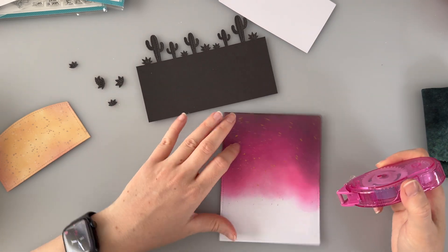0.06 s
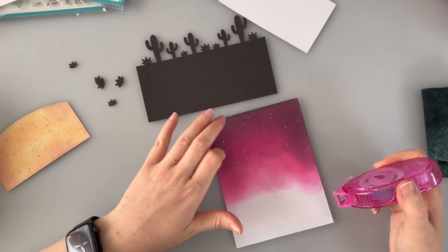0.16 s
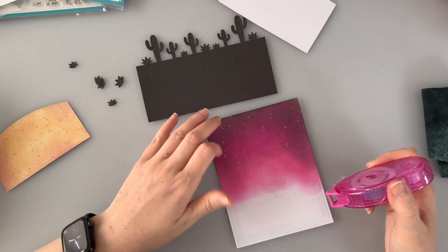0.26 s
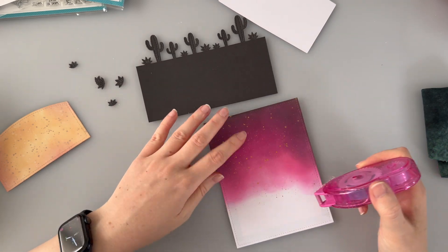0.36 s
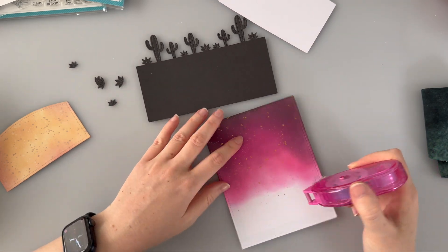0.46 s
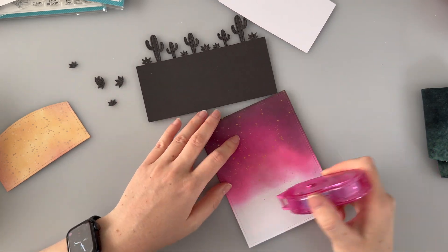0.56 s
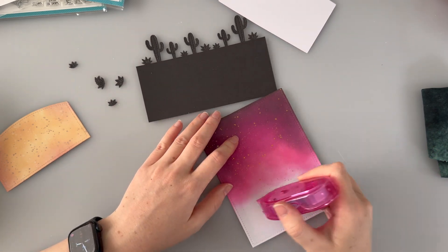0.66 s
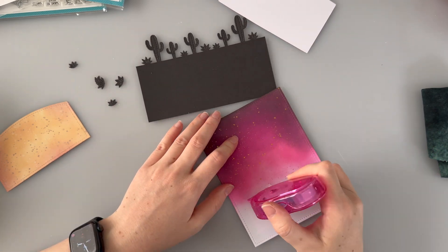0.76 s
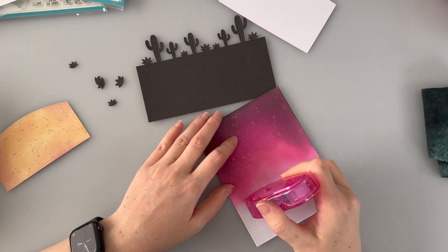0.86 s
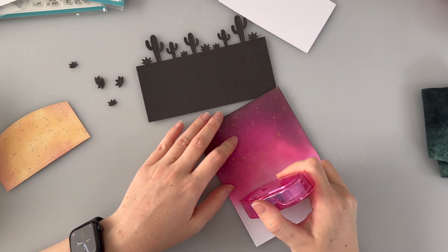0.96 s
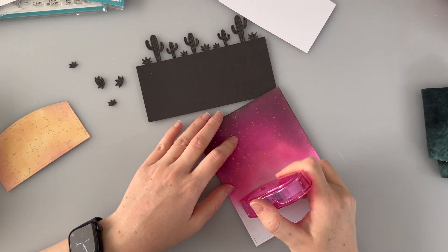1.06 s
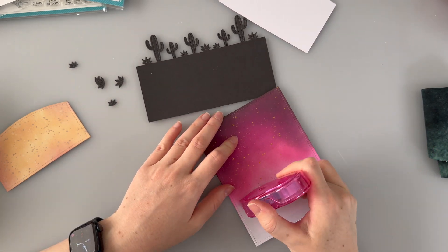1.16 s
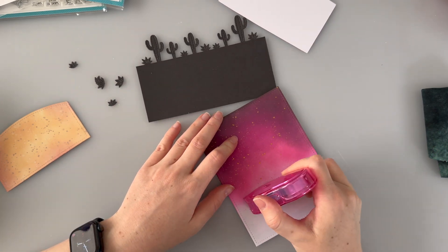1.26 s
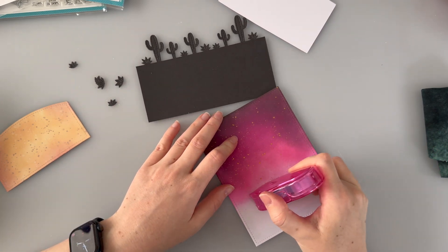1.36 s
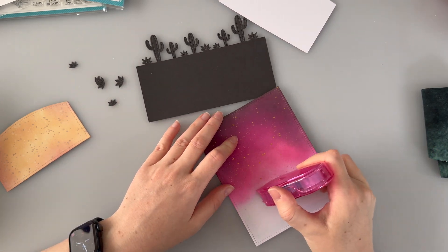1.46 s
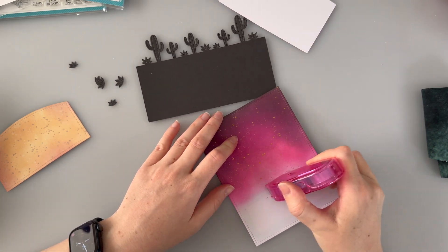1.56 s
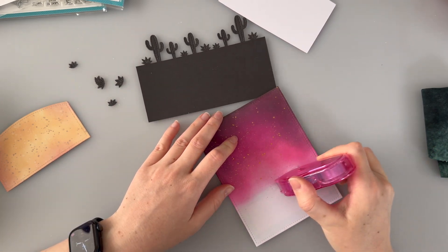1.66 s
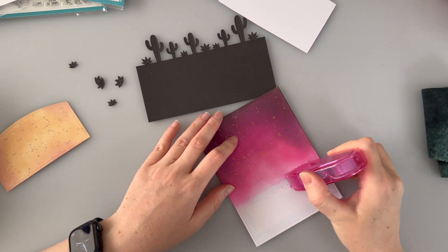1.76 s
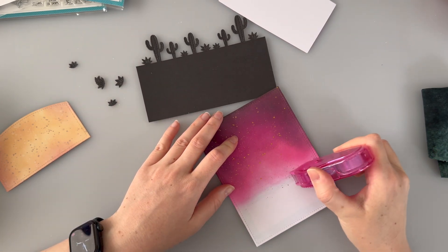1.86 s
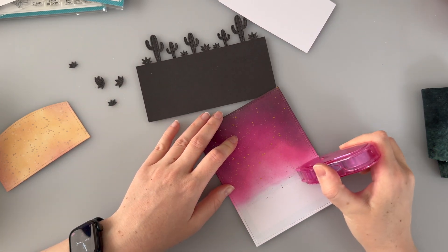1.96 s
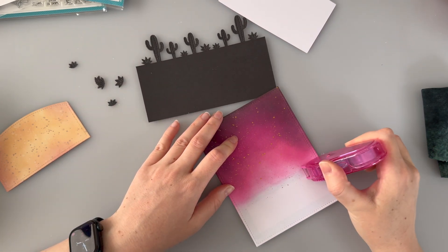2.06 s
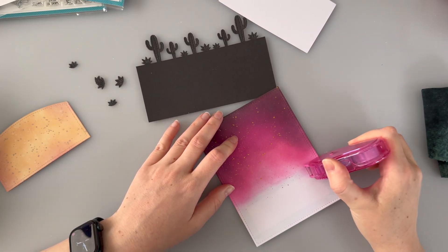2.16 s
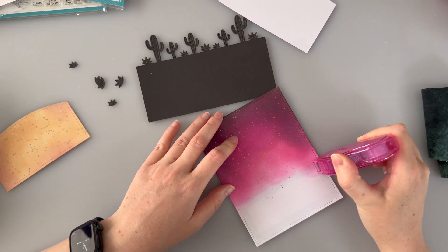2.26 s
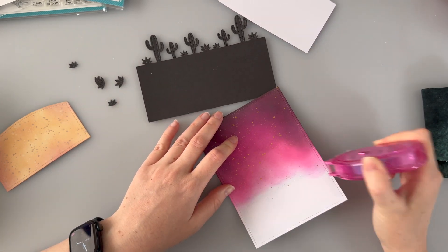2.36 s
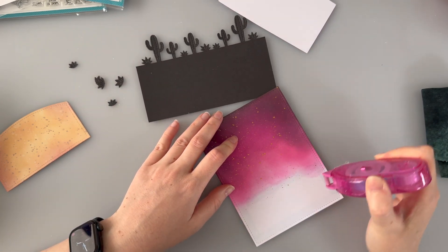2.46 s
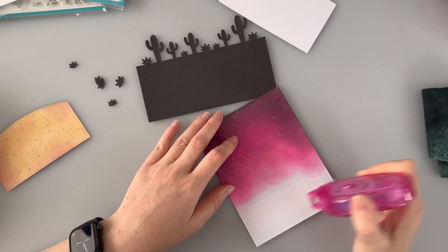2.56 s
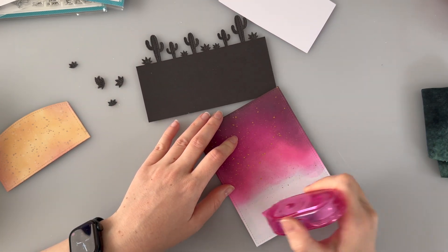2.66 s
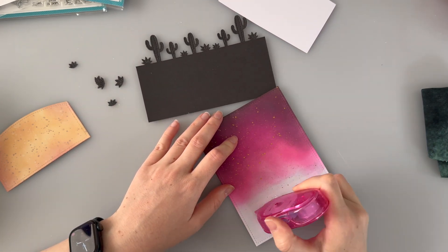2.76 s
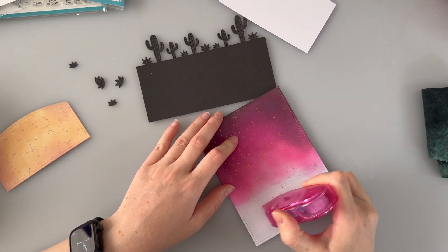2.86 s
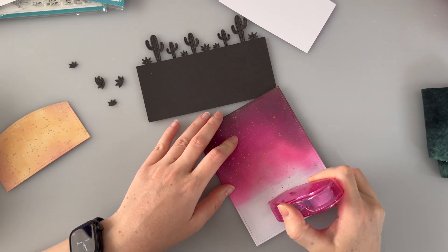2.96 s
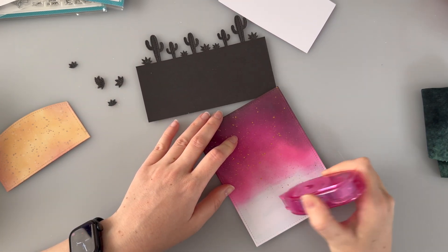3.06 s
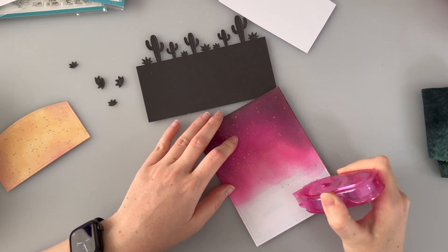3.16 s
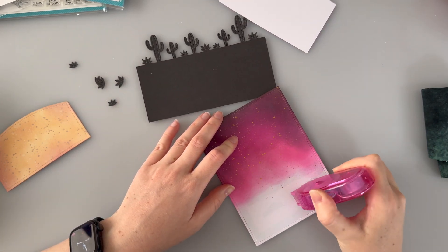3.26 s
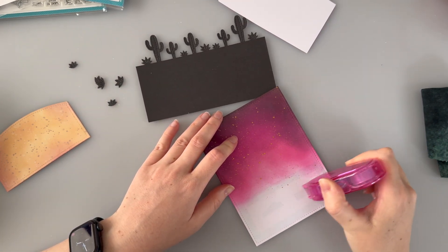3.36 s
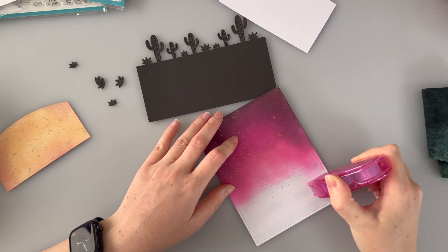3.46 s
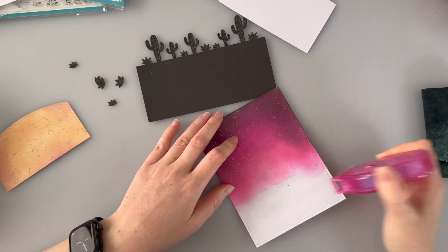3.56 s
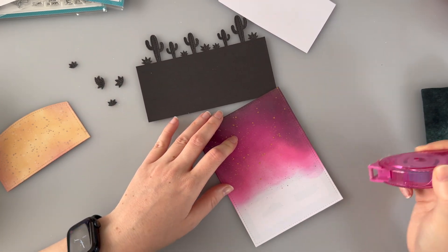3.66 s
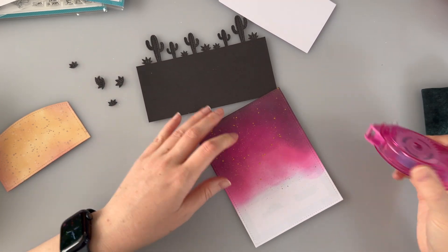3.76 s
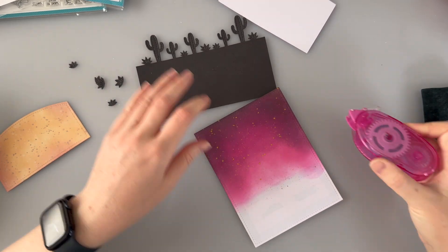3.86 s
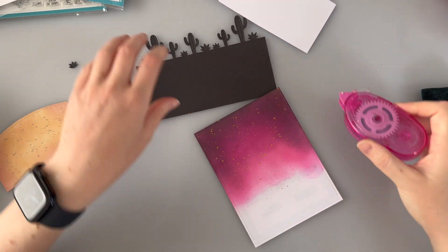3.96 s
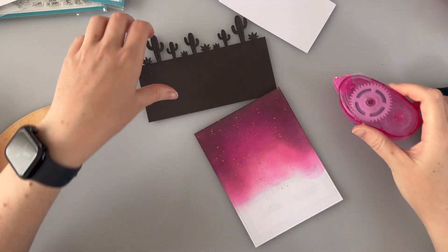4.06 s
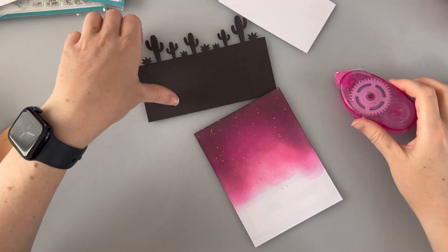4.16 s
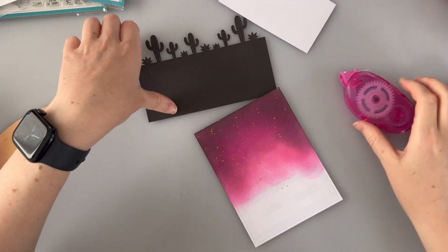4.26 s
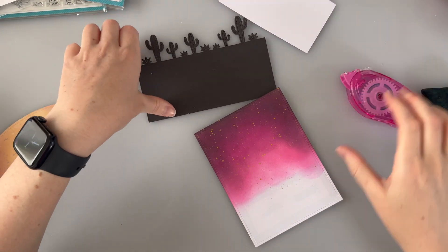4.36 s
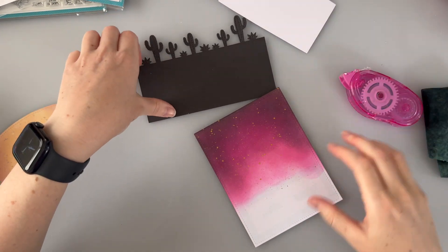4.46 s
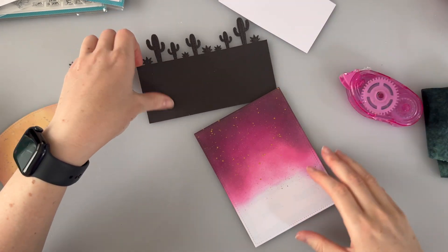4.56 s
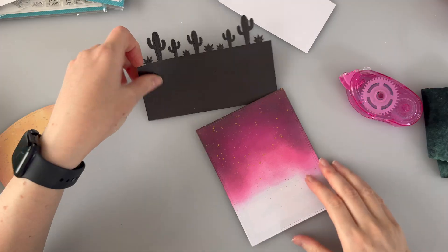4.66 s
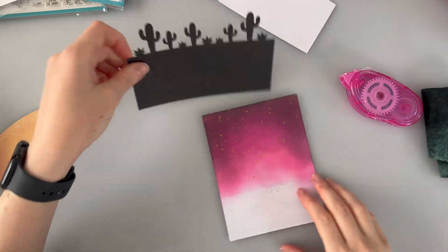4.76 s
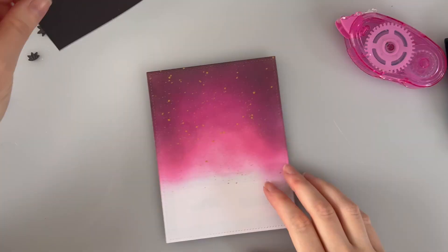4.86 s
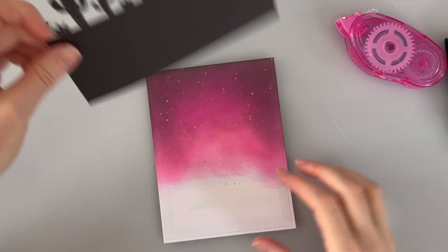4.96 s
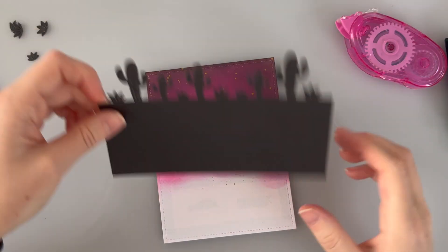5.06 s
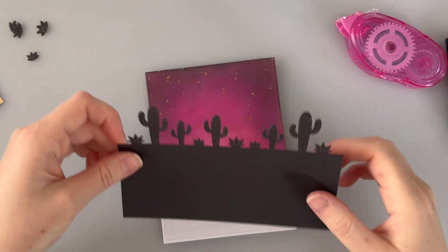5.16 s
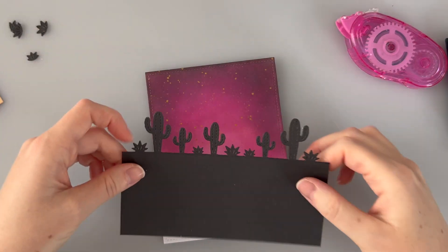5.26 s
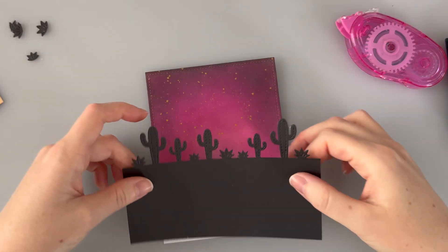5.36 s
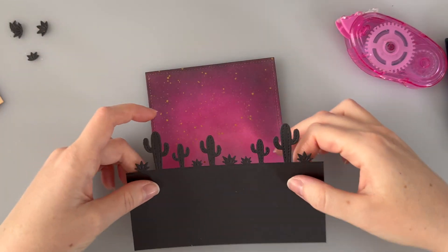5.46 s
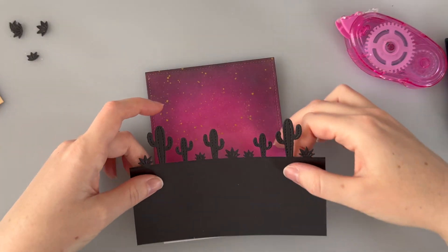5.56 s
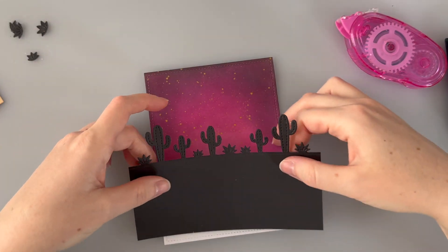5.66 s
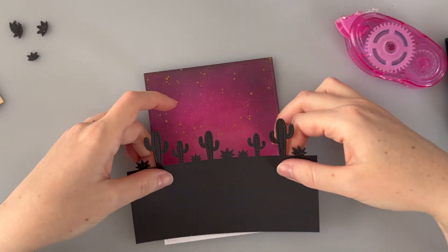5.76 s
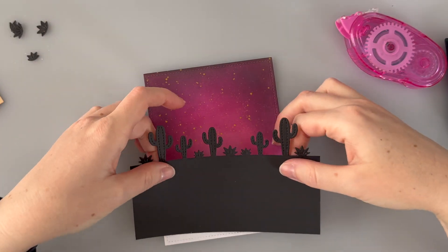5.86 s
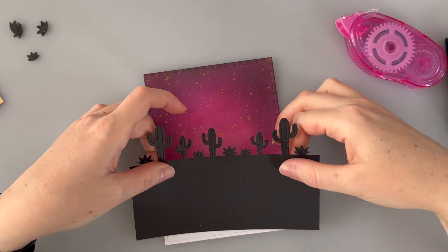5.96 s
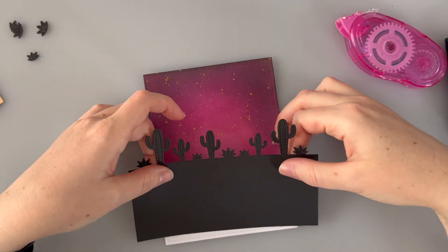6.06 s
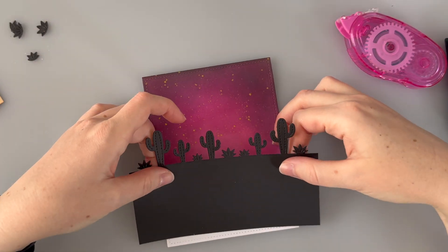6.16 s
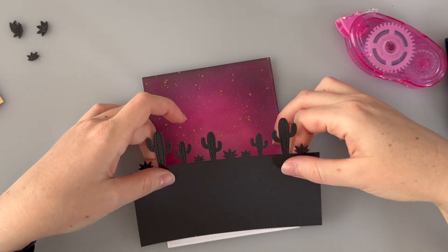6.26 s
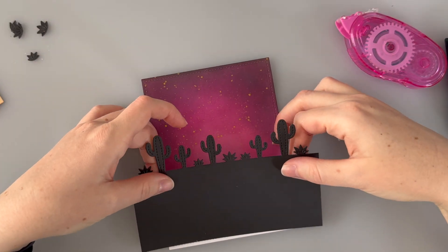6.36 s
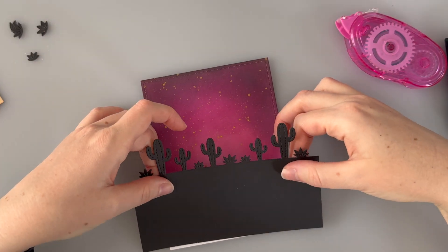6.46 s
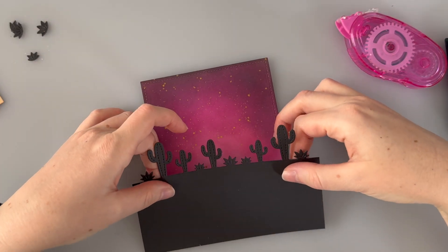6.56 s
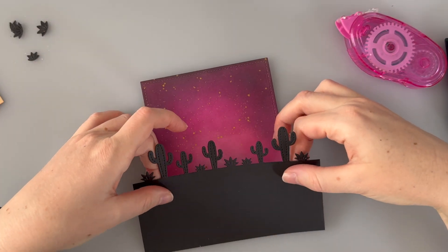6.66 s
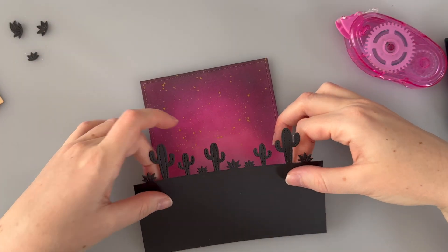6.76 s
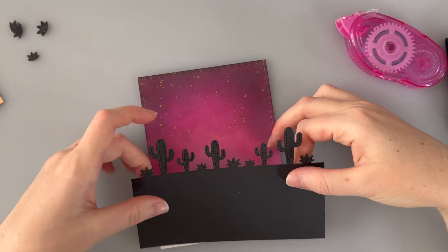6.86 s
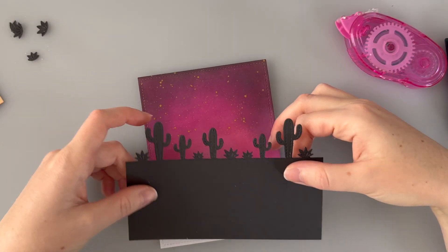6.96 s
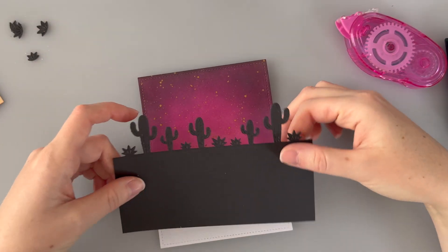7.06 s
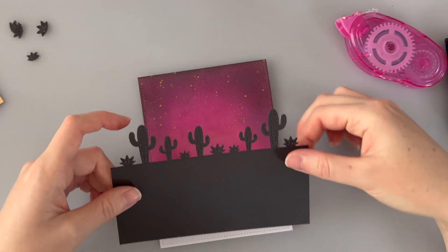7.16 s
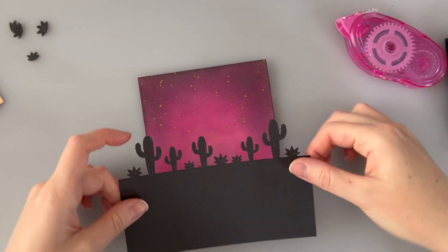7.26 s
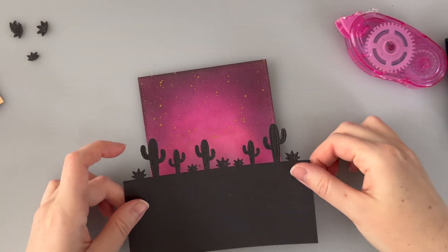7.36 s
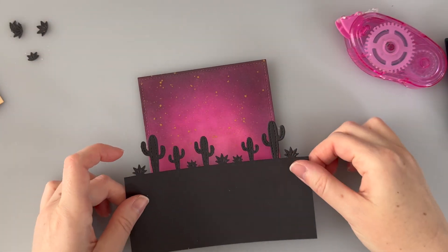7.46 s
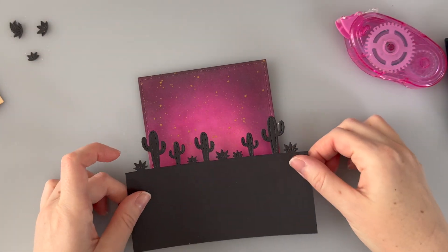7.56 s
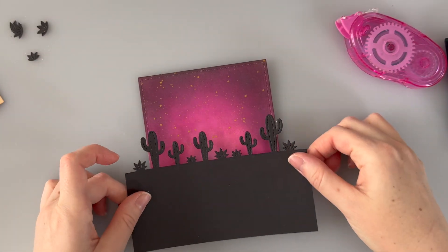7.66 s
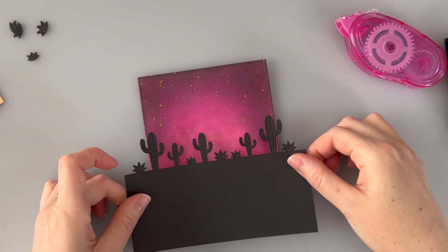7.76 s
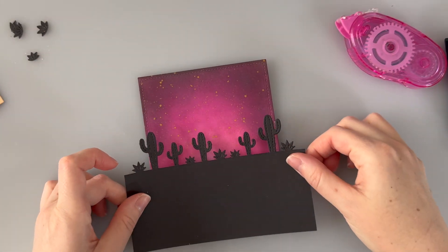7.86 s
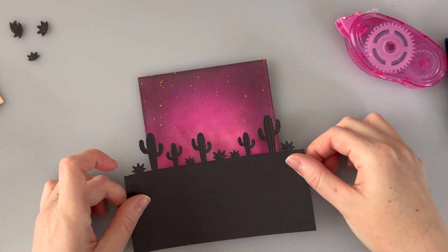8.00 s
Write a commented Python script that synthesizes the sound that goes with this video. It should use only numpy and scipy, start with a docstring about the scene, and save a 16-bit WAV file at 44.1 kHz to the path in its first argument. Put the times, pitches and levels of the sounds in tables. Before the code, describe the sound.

A small quiet room with soft low rumble and faint hiss, picked up closely in stereo with only short reverberation. From 0 to 1.1 s, fingers faintly scuff card, with a small tick near 0.4. At 1.2 s a plastic tape runner starts rolling: crisp ratchet clicks, slow at first, then packed into a rattling whirr around 1.5-1.8, slowing until 2.05. A few more clicks come at 2.25, then sharp tiny peeling ticks at 2.34. A knock at 2.76 begins a second short burst to 3.05; another light knock at 3.24 leads to a third, ending at 3.53. Near-silence follows. A light tap at 4.15 precedes the loud hard plastic clatter at 4.27-4.35, settling by 4.41. At 4.6-4.85 card slides with an airy swish and edge tick. From 5.1 to 8 s only faint card ticks, brushes and soft finger rubs remain.

```python
"""Low rumble and faint hiss fill a small quiet room: filtered noise, the rumble's level dipping after loud sounds.
First card scuffs softly under fingers: grainy noise in bands. From 1.2 s a plastic tape runner rolls over card
in bursts: noise-driven modes as its pawl snaps over gear teeth, rings the shell and is pressed to the desk;
its tip peels off with short ticks near 2.34 s. Just after 4 s it drops on the desk and knocks lying flat; then
card slides and its edges tick, as noise and damped modes. Two ports pick it up with differing phase and level."""
import sys
import numpy as np
from scipy import signal
from scipy.fft import rfft, irfft, next_fast_len
from scipy.io import wavfile
from scipy.ndimage import uniform_filter1d, map_coordinates

SR = 44100
rng = np.random.default_rng(int(sys.argv[2]) if len(sys.argv) > 2 else 0)


def wrap_up_sound(samples):
    """Save the sound to the file named by the first command line argument, as 16-bit audio."""
    columns = np.atleast_2d(samples).T
    # keep every value between -1 and 1, then stretch to whole-number steps
    tamed = np.clip(columns, -1, 1)
    steps = np.round(tamed * 32767).astype(np.int16)
    wavfile.write(sys.argv[1], SR, steps)


N = 354123

# Contact levels below are relative: blows() adds the gains given by each source.
# pawl snaps: start_s, level_db, ring_db (shell over snap)
TEETH = [(1.2043, -11.5, -17.5), (1.261, -9.5, -21.5), (1.2999, -10.5, -18.5), (1.3406, -10, -17),
         (1.363, -11.5, -12.5), (1.383, -11, -18), (1.404, -9.5, -16), (1.437, -10, -19), (1.4667, -8, -20),
         (1.499, -10.5, -16), (1.5187, -7, -16), (1.5409, -11, -15.5), (1.56, -12, -10),
         (1.586, -10.5, -13), (1.6089, -10, -10), (1.628, -13, -11.5), (1.6459, -9.5, -13),
         (1.6641, -16.5, -6), (1.6857, -13.5, -8), (1.7059, -12.5, -13), (1.7275, -15.5, -8),
         (1.7499, -13, -9), (1.7689, -14.5, -12.5), (1.7862, -13.5, -15), (1.8088, -12.5, -12.5),
         (1.8506, -12, -12.5), (1.913, -11, -17.5), (1.9592, -12, -16), (1.9879, -9, -20.5),
         (2.0068, -10.5, -18.5), (2.0385, -7, -27), (2.24, -10.5, -21), (2.2533, -11, -17),
         (2.2695, -11.5, -21), (2.837, -13.5, -12), (2.8523, -12.5, -14), (2.8628, -11.5, -11.5),
         (2.8738, -11.5, -9), (2.8849, -11, -21), (2.8937, -7, -14), (2.904, -18, -14),
         (2.9232, -10.5, -16), (2.9832, -10.5, -18), (3.0064, -14.5, -13.5), (3.019, -9, -9.5),
         (3.032, -11.5, -15.5), (3.043, -11.5, -12), (3.2903, -13.5, -11.5), (3.3225, -14, -11),
         (3.34, -11.5, -12.5), (3.356, -16.5, -13.5), (3.3654, -10, -16), (3.3741, -16.5, -8),
         (3.382, -15, -11.5), (3.394, -11, -17.5), (3.4187, -10.5, -21), (3.4949, -13.5, -14),
         (3.5135, -9.5, -27), (3.5292, -9.5, -14.5)]
# roller's seat on the card, heard in the shell's colour: start_s, low_over_high_db, middle_over_high_db
PRESSURE = [(1.2, 1.5, -4), (1.47, -2, -4.5), (1.52, 3.5, -3.5), (1.6, -2.5, -6), (1.702, 2, -6),
            (1.76, -5, -3.5), (1.852, -12, -3.5), (1.92, -3, -3.5), (2.051, 4.5, 0.5), (2.24, 3.5, 7),
            (2.27, 5, 3), (2.84, -2, -3), (2.92, -5.5, -7.5), (3.04, 1, -5), (3.3, -3, -2),
            (3.37, -0.5, -1), (3.42, 3.5, -2.5), (3.495, 0, 3.5), (3.529, -3, -3)]
# shell on card and desk: start_s, level_db, ring_db, tilt_db (per band of modes), thump_db (both over treble)
KNOCKS = [(1.851, -41, -6, -3, 0.5), (1.959, -44.5, -10, 2, -1), (2.159, -29, -29, 10, -41),
          (2.241, -44, -6, 7.5, -1), (2.7506, -37.5, -5.5, -5, -9), (2.7608, -24, -21, -5.5, -15.5),
          (3.2375, -33.5, -5.5, -4.5, -13.5), (3.2453, -36.5, -17, 13, -8), (3.2518, -30, -13, -8.5, -12.5),
          (3.497, -39, -5, -3.5, 6), (3.515, -41.5, -8.5, -2.5, 1.5), (3.8195, -60.5, 4.5, 0, -10),
          (3.969, -60, -0.5, -8.5, 3.5), (4.1448, -33.5, 3, -0.5, -19), (4.149, -20, -9, -8, -23.5),
          (4.1641, -27, -13.5, -12.5, -14), (4.267, -24, -5.5, 4.5, -18), (4.286, -12.5, -12.5, 1.5, -20.5),
          (4.2918, -20, -8.5, 10, -25), (4.2947, -9.5, -11, 2, -27), (4.298, -14.5, -10.5, -5, -27),
          (4.304, -19, -8.5, -1.5, -19), (4.3201, -17, -10, -3, -21.5), (4.3367, -23, -12, 0, -42.5),
          (4.3382, -23, -14, 9.5, -26), (4.3405, -16.5, -15.5, -3.5, -16.5),
          (4.3492, -26.5, -24.5, 4.5, -20.5), (4.4011, -37, -5, -6, -15), (4.4064, -31, -12.5, 11, -16.5),
          (4.409, -31, -13, -5, -28.5)]
# short ticks, of card edges on desk and card and of the runner's tip peeling off near 2.34 s:
# start_s, level_db, body_db (over treble), tilt_db (per band of modes), contact_s (t60 less 1 ms)
TICKS = [(0.335, -87, 20, -6, .008), (0.41, -39.5, -1.5, -4, 0.015), (1.0288, -56.5, -7, 26, .013),
         (1.048, -65, 14, -10, .013), (1.104, -79, -4, 1, 0.012), (2.3399, -20, -5.5, 13, 0.0015),
         (2.3435, -27, 6.5, 6, 0.0015), (2.3668, -28, 2, -1.5, 0.0013), (3.698, -62.5, 8.5, 17, 0.0057),
         (3.746, -42, 8, 8, .005), (4.6, -28, -21, -10.5, 0.034), (4.6396, -26, -9.5, 21.5, 0.028),
         (5.098, -37.5, 4.5, 4.5, 0.02), (5.102, -44.5, 3, -5.5, 0.025), (5.213, -33, 6.5, 1, 0.00097),
         (5.233, -40, -1, -10, 0.021), (5.2634, -37, -2.5, -10.5, 0.043), (5.521, -57.5, 9, -12, 0.012),
         (5.572, -48, -9.5, 26, 0.049), (5.7034, -45.5, 8.5, 1.5, 0.014), (6.026, -64, 22, 1, .04),
         (6.351, -80, 16, 5, 0.016), (6.492, -68, 15, 2, 0.044), (6.9637, -42, -11, 3, 0.016),
         (6.968, -48, 6.5, -0.5, 0.028), (7.39, -62, 12, 9, 0.023), (7.511, -64.5, 10, 22.5, .03)]
# runner's weight landing on the desk: start_s, desk_modes_peak_db, push_s, bending_wave_db
PRESSES = [(1.9166, -27.5, 0.00026, -28), (2.757, -35, 0.0027, -42), (3.243, -30.5, 0.0012, -44),
           (4.284, -29.5, 0.00049, -40)]
# card under fingers: start_s, length_s, rustle_db, swish_db, hiss_db, bright_hz
SCUFFS = [(0.005, 0.04, -66, -68, -61, 1808), (0.057, 0.085, -54.5, -64.5, -55.5, 1780),
          (0.176, 0.013, -76, -88, -92, 1896), (0.423, 0.079, -67.5, -75, -64.5, 1702),
          (0.645, 0.054, -85.5, -78, -71, 2264), (1.025, 0.036, -69.5, -95, -97, 1888),
          (2.213, 0.18, -49.5, -52, -50, 3200), (3.54, 0.017, -52.5, -63, -63.5, 3510),
          (3.637, 0.13, -70.5, -64, -79.5, 2885), (4.162, 0.088, -50, -58, -79, 1329),
          (4.477, 0.071, -64, -69, -87, 1860), (4.584, 0.068, -67.5, -48.5, -40.5, 3240),
          (4.673, 0.021, -50, -57, -53, 2250), (4.718, 0.028, -41, -54, -50, 2404),
          (4.773, 0.085, -57, -60, -51, 2150), (5.11, 0.0061, -64.5, -82, -74, 3295),
          (5.225, 0.028, -58, -76, -70, 909), (5.262, 0.016, -68.5, -84, -74, 797),
          (5.315, 0.045, -68.5, -69, -63, 2670), (5.378, 0.018, -55.5, -70, -65, 3740),
          (5.42, 0.058, -58.5, -67.5, -60, 2830), (5.532, 0.0045, -65.5, -73, -89, 1600),
          (5.592, 0.06, -66.5, -76, -69, 3540), (5.634, 0.16, -66, -75, -73, 2650),
          (6.034, 0.011, -58, -81, -84.5, 2560), (6.145, 0.03, -69, -90.5, -88, 2580),
          (6.182, 0.012, -59, -83, -88, 2744), (6.304, 0.056, -73.5, -88, -86, 2650),
          (6.363, 0.058, -66, -86, -82.5, 2800), (6.495, 0.022, -65.5, -81, -77, 2920),
          (6.509, 0.19, -68.5, -79, -81, 2840), (6.729, 0.028, -62.5, -81, -84, 1650),
          (6.766, 0.058, -65, -72, -66, 2660), (6.792, 0.015, -60, -74, -76, 2996),
          (6.882, 0.072, -66, -72, -64, 2127), (7.015, 0.11, -62.5, -67.5, -63, 1502),
          (7.063, 0.014, -58.5, -80, -64, 1775), (7.163, 0.098, -70.5, -74.5, -67, 1958),
          (7.248, 0.1, -66, -75, -68, 2138), (7.295, 0.011, -63, -70, -69, 1960),
          (7.395, 0.025, -63.5, -77, -71, 2610), (7.522, 0.0053, -64, -75, -70, 2956),
          (7.539, 0.012, -53, -66, -73, 2800)]

# modes of the desk, the upright shell, the shell flat on its side, and the tick's body: pitch_hz, level_db, width_hz
DESK = [(81, -11.5, 73), (116, -0.5, 40), (168, -1.5, 66), (293, -6.5, 210), (405, -14, 1100)]
SHELL = [(970, -9.5, 68), (1095, 1, 130), (1250, 5.5, 45), (1414, 7, 100), (1606, -4, 69), (1860, -6, 30),
         (2044, 3, 140), (2490, -1.5, 210), (2660, 2, 80), (2990, -5.5, 140), (3490, 2.5, 170),
         (3510, -3.5, 1400), (4470, -0.5, 380), (4650, 0, 270)]
LYING = [(719, -13.5, 180), (1290, 0.5, 150), (1534, 2.5, 52), (1860, 4.5, 240), (2193, -2.5, 330),
         (2800, 0.5, 200), (3130, 2.5, 310), (3780, -3, 750), (4400, -3, 640)]
CARD = [(850, -4, 1700), (1383, 4, 520), (2150, -5, 570), (3340, -3, 710), (4190, -10.5, 1600)]
# bounds of low, middle and high modes: pitch_hz
BAND_EDGES_HZ = [1650, 2900]
# chance spread of mode strength from blow to blow: level_db for low, middle, high
MODE_SCATTER_DB = [1.2, 2.5, 2.5]
# roller scrape through the shell: level_db for low, middle, high modes
ROLL_BANDS_DB = (6, -6, -10)

# spectra of an impact's crack and of card noises (whistle: card skimming the desk): pitch_hz, level_db
CRACK = [(3000, -28.5), (5400, -13.5), (6500, -5), (8200, 4), (9800, -5.5), (11800, 3.5), (13000, 5),
         (14300, 6), (15600, 3), (17000, -5)]
RUSTLE = [(350, -36.5), (600, -17), (922, -5), (1180, -6.5), (1480, -2), (1750, -2.5), (2150, -5),
          (2750, -2.5), (3400, -7.5), (4100, -5.5), (4700, -12.5), (5850, -64), (9900, -120)]
SWISH = [(3600, -31), (4400, -13.5), (5200, -6.5), (6200, -6), (7200, -5), (8500, -20)]
WHISTLE = [(3900, -43.5), (4400, -4.5), (4850, 1.5), (5150, -2), (5600, -42)]
HISS = [(7000, -24.5), (9000, -5.5), (12800, 1), (15900, -2), (16500, -22.5)]
# rustle's bright band, sharp while card skims the desk: start_s, level_db, width (natural log of frequency)
BRIGHT = [(0, 8, .12), (1.2, 9.5, .12), (2, 1, .36), (4.1, 10, .15), (4.25, 8.5, .15), (4.45, 3, .36),
          (4.64, 6, .36), (4.67, 9.5, .16), (4.76, 3, .2), (4.86, 6.5, .2), (5, 6, .36), (5.33, 5, .36),
          (5.37, 14.5, .08), (5.41, 10.5, .08), (5.44, -3, .36), (7.05, 1.5, .36), (7.075, 7.5, .15),
          (7.11, 2.5, .36)]
# whistle against swish: start_s, level_db
WHISTLE_DB = [(0, 4), (.2, -1), (.45, -8), (.65, 6), (1.2, 3), (2, -7.5), (4.6, -14), (4.8, -2.5),
              (5.3, -6), (6.5, -14), (8, -3.5)]

# low rumble, its level dipping after loud sounds; random lumps are added: start_s, deep_db, upper_db
RUMBLE_DB = [(0.0, -53, -56), (0.36, -55.5, -59), (0.6, -59.5, -59.5), (1.19, -56.5, -61.5),
             (1.5, -61, -49), (1.72, -58.5, -51.5), (2.19, -60.5, -58), (2.35, -66, -53.5),
             (2.48, -70, -63), (2.79, -66, -67), (2.93, -60, -54.5), (3.35, -62.5, -54.5),
             (3.65, -75.5, -63.5), (3.98, -67, -66.5), (4.18, -67.5, -63), (4.36, -63, -55),
             (4.52, -57.5, -52.5), (5.01, -60.5, -57.5), (5.37, -55.5, -56), (5.86, -63, -62),
             (6.91, -63, -57.5), (7.18, -60, -55.5), (7.54, -67, -63.5), (8.03, -61, -62.5)]
# spectra of the rumble, and of still air with microphone hiss: pitch_hz, level_db
RUMBLE = [(13, -36.5), (22, -14.5), (48, -1), (156, 0), (193, -5.5), (268, -7), (299, 0), (328, -9.5),
          (389, -12), (414, -19), (441, -5.5), (523, -28.5), (900, -37.5), (1170, -57.5), (1980, -120)]
AIR = [(290, -27.5), (500, -4.5), (775, -10.5), (847, -10.5), (966, -12.5), (6960, -26), (9330, -35),
       (12000, -31.5), (13800, -25), (16500, -48.5)]
# left-right likeness of the room tone before the ports: pitch_hz, likeness
FLOOR_ALIKE = [(40, 1), (150, .93), (300, 0.29), (1000, 0.091), (8000, 0.13)]
# reverberation: pitch_hz, t60_s
ROOM = [(150, 0.31), (1500, 0.27), (5000, 0.37), (9500, 0.08), (13000, 0.15), (16000, 0.43)]
# starting colour of the reverberation: pitch_hz, level_db
ROOM_COLOUR = [(150, 5), (1500, 3), (5000, 2), (9000, 5), (12000, -2.5), (15000, -6)]
# left-right likeness of the reverberation before the ports: pitch_hz, likeness
ROOM_ALIKE = [(150, 0.15), (1500, 0.066), (5000, 0.043), (8000, 0.92), (15000, 1)]
# response shared by both ports: pitch_hz, level_db
MIC = [(25, -6.5), (45, -1), (15600, -2), (16100, -17), (16900, -32)]
# phase between ports: pitch_hz, left_lead_rad
PORT_PHASE = [(600, 0), (1300, -.6), (2300, -.3), (3300, .7), (6300, .5), (7700, 3), (11000, 2.3),
              (16000, .5)]
# level between ports: pitch_hz, left_minus_right_db
PORT_BALANCE = [(60, 0.5), (110, 1.0), (200, 1.0), (380, 3.0), (700, 0.0), (1290, -0.5), (2380, -2.5),
                (4400, -1.5), (8120, 1.5), (15000, 0.0)]

AIR_DB, RUMBLE_SPLIT_HZ, TOP_HZ = -71, 110, 16900
SCUFF_RISE_DB_PER_S, SCUFF_FADE_DB_PER_S = 610, 513.5
KNOCK_MIDDLE_DB, TICK_MIDDLE_DB = 3, 1.5  # middle modes over the line from low to high
TICK_THUMP_DB = -55.5  # desk thump of a fingertip, independent of the tick's level
TOOTH_THUMP_DB, TOOTH_SCATTER_DB = -34.5, 1.2  # desk thump against the snap; chance spread per band
SNAP_T60, PUSH_T60 = .007, .011  # s: the pawl's impact; its drive of the shell
KNOCK_T60, FLAT_T60 = .007, .005  # s: a knock's drive of the upright shell; of the flat shell
SET_DOWN_S = 4  # from here the runner lies on its side
FLAT_WET_DB, PRESS_WET_DB = -7, -14.5  # room level
MODE_SCATTER = .015  # relative pitch spread of middle and high modes: grip and contact point shift
RING_RISE_S, RING_FIRM = .001, .8  # the drive builds up; size of one firm blow over its noise
FIRM_S = .0005  # base width of the firm blow: being rounded, it drives the low modes
CHATTER_DB, CHATTER_T60 = -24, .04  # faint rattling after a blow; its decay in s
ROLL_DB, ROLL_SPAN_S = -50.5, 0.038  # scrape gain per unit of speed; span over which speed is felt
# bending wave: pitch falls as turns / (time + start) towards its end
BEND_TURNS, BEND_START_S, BEND_END_HZ, BEND_T60 = 0.91, 0.0019, 44.7, .11


def amp(db):
    """Level law: decibels become an amplitude ratio."""
    return 10 ** (np.asarray(db) / 20)


def unit(x):
    """Normalisation to a root-mean-square of 1."""
    return x / np.sqrt(np.mean(x ** 2) + 1e-20)


def along(points, hz):
    """Interpolation of (Hz, value) points on a logarithmic frequency axis."""
    f, v = np.transpose(points)
    return np.interp(np.log(hz + 1), np.log(f + 1), v)


def curves(rows):
    """Linear interpolation in time: one value per sample for each column after the time."""
    s, *cols = np.transpose(rows)
    return [np.interp(np.arange(N) / SR, s, c) for c in cols]


def wobble(rate):
    """Slow random modulation: a smooth curve through rate random knots a second."""
    knots = rng.standard_normal(int(N * rate / SR) + 4)
    return map_coordinates(knots, [np.arange(N) * rate / SR])


def filtered(x, response):
    """Linear filtering: the spectrum of x times a response of frequency."""
    m = next_fast_len(x.shape[-1] + 4096)
    return irfft(rfft(x, m) * response(np.fft.rfftfreq(m, 1 / SR)), m)[..., :x.shape[-1]]


def blended(pair, alike, spectrum):
    """Partial coherence: two unrelated noises become a coloured left and right of given likeness."""
    def mid_side(hz):
        turn = np.arccos(np.clip(along(alike, hz), -1, 1)) / 2
        return amp(along(spectrum, hz)) * [np.cos(turn), np.sin(turn)]
    mid, side = filtered(pair, mid_side)
    return np.array([mid + side, mid - side])


def room_tail():
    """Diffuse reverberation: a fresh noise tail whose bands die at their own rates, left energy 1."""
    hz, t, z = signal.stft(rng.standard_normal((2, SR // 3)), SR, nperseg=256)
    turn = np.arccos(np.clip(along(ROOM_ALIKE, hz), -1, 1))[:, None] / 2
    decay_db = along(ROOM_COLOUR, hz)[:, None] - 60 * t / along(ROOM, hz)[:, None]
    mid, side = z * amp(decay_db) * [np.cos(turn), np.sin(turn)]
    tail = signal.istft(np.array([mid + side, mid - side]), SR, nperseg=256)[1]
    return tail / np.linalg.norm(tail[0])


def tilted(db, tilt_db, middle_db):
    """Spectral tilt: levels of the low, middle and high modes."""
    return db - tilt_db, db + middle_db, db + tilt_db


def resonances(modes, band_db=(0, 0, 0)):
    """Modal superposition: causal damped modes, each call drawing new strengths and upper pitches."""
    hz, db, width = np.transpose(modes)[..., None]
    band = np.digitize(hz, BAND_EDGES_HZ)
    scatter_db = np.take(MODE_SCATTER_DB, band) * rng.standard_normal(hz.shape)
    gain = amp(db + np.take(band_db, band) + scatter_db)
    gain = gain * (-1.) ** np.arange(len(modes))[:, None]  # neighbours in opposite sign
    hz = hz * (1 + MODE_SCATTER * (band > 0) * rng.standard_normal(hz.shape))
    return lambda f: np.sum(gain * 1j * f * width / (hz * hz - f * f + 1j * f * width), axis=0)


def struck(response, t, lag, t60, unlike, after_db, after_t60, rise=.0002, firm=0):
    """Impact excitation: decaying noise and chatter through a response; rows left, right, room."""
    decay = amp(-60 * t / t60) + amp(after_db - 60 * t / after_t60)
    drive = np.clip((t - lag) / rise, 0, 1) * decay
    mid, side = rng.standard_normal((2, len(t))) * drive
    blow = np.maximum(1 - np.abs(t - t[np.argmax(drive)]) * 2 / FIRM_S, 0)
    mid = mid + firm * np.linalg.norm(drive) * blow / blow.sum()
    click = t == t[200]  # a single sample excites the room's row

    def heard(hz):
        near = response(hz)
        # the room hears all sides, so upper modes blur
        blur = np.sqrt(np.abs(uniform_filter1d(np.abs(near) ** 2, size=150)))
        return np.array([near, near, np.where(hz > BAND_EDGES_HZ[0], blur, near)])

    left, right, room = filtered(np.array([mid + unlike * side, mid - unlike * side, click]), heard)
    # the mean of left and right takes the room row's energy
    size = np.linalg.norm([left + right, left + right, 2 * room], axis=1)[:, None]
    return np.array([left, right, room]) * np.linalg.norm(room) / size * 2


def blows(table, body, crack_db, crack_t60, push_t60, ring_db, thump_db, wet_db):
    """Contact radiation: a bright crack, the body's modes, a thump in the desk and the room's reply."""
    out, t = np.zeros((2, N + SR)), np.arange(SR // 12) / SR
    lasting = np.transpose(np.broadcast_arrays(crack_t60, push_t60, np.zeros(len(table)))[:2])
    for (s, db, *band_db, desk_db), (crack_s, push_s) in zip(table, lasting):
        crack = struck(lambda hz: amp(along(CRACK, hz)), t, 0.00087, crack_s, unlike=0.33,
                       after_db=-3, after_t60=2 * crack_s)
        ring = struck(resonances(body, band_db), t, 0.000876, push_s, unlike=0.22, after_db=CHATTER_DB,
                      after_t60=CHATTER_T60, rise=RING_RISE_S, firm=RING_FIRM)
        thump = struck(resonances(DESK), t, .0012, 0.0017, unlike=0.084, after_db=-38.5, after_t60=0.019)
        hit = amp(crack_db) * crack + amp(ring_db) * ring + amp(desk_db + thump_db) * thump
        hit = amp(db) * hit
        wet = amp(wet_db) * signal.fftconvolve(hit[2:], room_tail(), axes=1)
        start = round(s * SR)
        out[:, start:start + len(t)] += hit[:2]
        out[:, start:start + wet.shape[1]] += wet
    return out[:, :N]


def room_tone():
    """Modulated noise: a two-part low rumble, dipping after loud sounds, over steady faint hiss."""
    deep_db, upper_db = curves(RUMBLE_DB)
    rumble = blended(rng.standard_normal((2, N)), FLOOR_ALIKE, RUMBLE)
    deep = filtered(rumble, lambda hz: 1 / (1 + (hz / RUMBLE_SPLIT_HZ) ** 4))
    lumps_db = 1.2 * wobble(4.6) + 0.66 * wobble(13)  # shared by both parts
    low = amp(deep_db + lumps_db + 1.5 * wobble(7.9)) * unit(deep)
    low = low + amp(upper_db + lumps_db + 1.5 * wobble(6.3)) * unit(rumble - deep)
    return low + amp(AIR_DB) * unit(blended(rng.standard_normal((2, N)), FLOOR_ALIKE, AIR))


def scuffing():
    """Exponential envelopes: scuffs rise fast, hold and fade; bright bands average by rustle gain."""
    t, gains = np.arange(N) / SR, 0
    for start, length, rustle_db, swish_db, hiss_db, hz in SCUFFS:
        rise_db = -SCUFF_RISE_DB_PER_S * np.maximum(start - t, 0)
        fade_db = -SCUFF_FADE_DB_PER_S * np.maximum(t - start - length, 0)
        levels = np.array([amp(rustle_db), amp(swish_db), amp(hiss_db), amp(rustle_db) * hz])
        gains = gains + levels[:, None] * amp(np.maximum(rise_db + fade_db, -200))
    return *gains[:3], gains[3] / gains[0]


def grains():
    """Stick-slip friction: fibres catch and let go, as stereo noise in uneven grains."""
    return amp(0.9 * wobble(60) + 2.5 * wobble(500)) * rng.standard_normal((2, N))


def card():
    """Friction noise: a rustle with a wandering bright band, a swish with a whistle, and a fine hiss."""
    low, middle, top, centre_hz = scuffing()
    hz, t, z = signal.stft(grains(), SR, nperseg=512)
    when, *shape = np.transpose(BRIGHT)
    height_db, width = [np.interp(t, when, column) for column in shape]
    distance = np.log((hz[:, None] + 1) / np.interp(t * SR, np.arange(N), centre_hz))
    bright = 1 + amp(height_db) * np.exp(-(distance / width) ** 2)
    # random patches over frequency and time
    patches = uniform_filter1d(rng.standard_normal(bright.shape), size=4, axis=0)
    patches = amp(2.5 * unit(uniform_filter1d(patches, size=5, axis=1)))
    fibres = signal.istft(z * bright * patches, SR, nperseg=512)[1][:, :N]
    rustle = unit(blended(fibres, [(1000, 0.65)], RUSTLE))
    swish = unit(blended(grains(), [(5000, 0.037)], SWISH))
    whistle = unit(blended(grains(), [(5000, 0.22)], WHISTLE))
    swish = swish + amp(curves(WHISTLE_DB)[0]) * whistle
    hiss = unit(blended(grains(), [(8000, 1.0)], HISS))
    return low * rustle + middle * swish + top * hiss


def ticks():
    """Heavily damped modes: card edges tick on desk and card; the runner's tip peels off near 2.34 s."""
    table = [(s, db, *tilted(body_db, tilt_db, TICK_MIDDLE_DB), TICK_THUMP_DB - db)
             for s, db, body_db, tilt_db, _ in TICKS]
    contact_t60 = [row[-1] + 1e-3 for row in TICKS]
    return blows(table, CARD, crack_db=13.0, crack_t60=contact_t60, push_t60=contact_t60,
                 ring_db=19.0, thump_db=37.0, wet_db=-9.0)


def presses():
    """Dispersion: a push and rebound rings the desk and sends a bending wave, high part first."""
    t, out = np.arange(SR // 5) / SR, np.zeros((2, N + SR))
    turns = BEND_TURNS * np.log(1 + t / BEND_START_S) + BEND_END_HZ * t
    bend = np.sin(2 * np.pi * turns) * amp(-60 * t / BEND_T60)
    for s, db, push_s, bend_db in PRESSES:
        u = t / push_s
        thud = filtered(u * (2 - u) * np.exp(-u), resonances(DESK))
        thud = amp(db) * thud / np.abs(thud).max() + amp(bend_db) * bend
        wet = amp(PRESS_WET_DB) * signal.fftconvolve(thud[None], room_tail(), axes=1)
        start = round(s * SR)
        out[:, start:start + len(t)] += thud
        out[:, start:start + wet.shape[1]] += wet
    return out[:, :N]


def knocks():
    """Modes under changed support: the shell knocks upright in the hand, then lying flat."""
    table = [(s, db, *tilted(ring_db, tilt_db, KNOCK_MIDDLE_DB), desk_db)
             for s, db, ring_db, tilt_db, desk_db in KNOCKS]
    upright = [row for row in table if row[0] < SET_DOWN_S]
    flat = [row for row in table if row[0] >= SET_DOWN_S]
    held = blows(upright, SHELL, crack_db=14.0, crack_t60=0.013, push_t60=KNOCK_T60,
                 ring_db=34.0, thump_db=46.5, wet_db=-6.0)
    lying = blows(flat, LYING, crack_db=15, crack_t60=FLAT_T60, push_t60=FLAT_T60,
                  ring_db=32.5, thump_db=46.0, wet_db=FLAT_WET_DB)
    return held + lying


def roll():
    """Friction-driven resonance: peeling tape and scraping roller, louder as teeth pass faster."""
    tooth_samples = np.round(np.transpose(TEETH)[0] * SR).astype(int)
    passing = np.bincount(tooth_samples, minlength=N)
    speed = np.abs(signal.fftconvolve(passing, np.hanning(round(ROLL_SPAN_S * SR)))[:N])
    grit = amp(6.7 * wobble(300)) * rng.standard_normal((2, N))
    mid, side = filtered(grit, resonances(SHELL, ROLL_BANDS_DB))
    return amp(ROLL_DB) * speed * unit(np.array([mid + 0.25 * side, mid - 0.23 * side]))


def ratchet():
    """Repeated impact: the pawl drops off each tooth and rings the shell, coloured by pressure."""
    s, snap_db, ring_db = np.transpose(TEETH)
    when, low_db, middle_db = np.transpose(PRESSURE)
    low_ring_db = ring_db + np.interp(s, when, low_db)
    middle_ring_db = ring_db + np.interp(s, when, middle_db)
    colour = np.transpose([low_ring_db, middle_ring_db, ring_db, 0 * s + TOOTH_THUMP_DB])
    colour = colour + TOOTH_SCATTER_DB * rng.standard_normal(colour.shape)
    return blows(np.column_stack([s, snap_db, colour]), SHELL, crack_db=17.0, crack_t60=SNAP_T60,
                 push_t60=PUSH_T60, ring_db=34.5, thump_db=46.5, wet_db=-8.0)


def scene():
    """Superposition of all sources; room tone and sliding card lean a little to the left."""
    background = amp([[.8], [-.8]]) * (room_tone() + card())
    return background + ticks() + presses() + knocks() + roll() + ratchet()


def record(dry):
    """Two-port reception: ports differ in phase and level, opposed near 8 kHz, with a top band limit."""
    def half(hz):
        return np.exp(.5j * along(PORT_PHASE, hz)) * amp(along(PORT_BALANCE, hz) / 2)
    ports = filtered(dry, lambda hz: amp(along(MIC, hz)) * np.array([half(hz), 1 / half(hz)]))
    return filtered(ports, lambda hz: hz < TOP_HZ)


dry = scene()
out = record(dry)
wrap_up_sound(out)
```